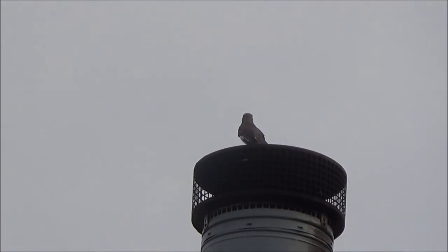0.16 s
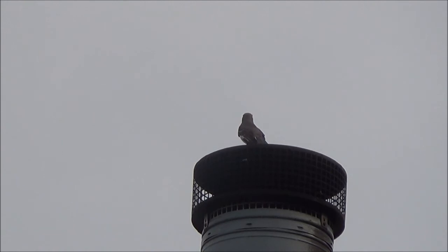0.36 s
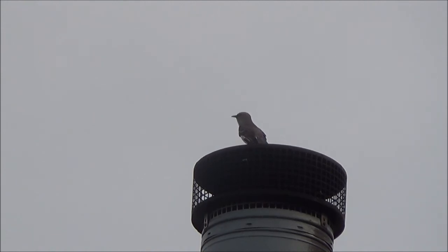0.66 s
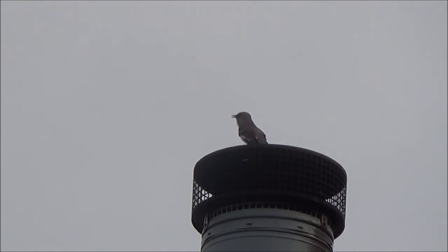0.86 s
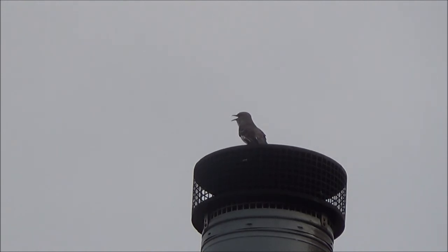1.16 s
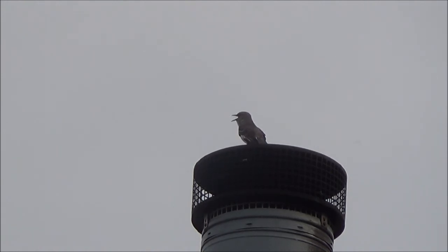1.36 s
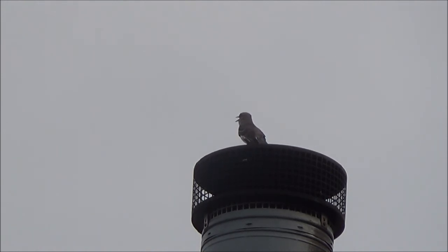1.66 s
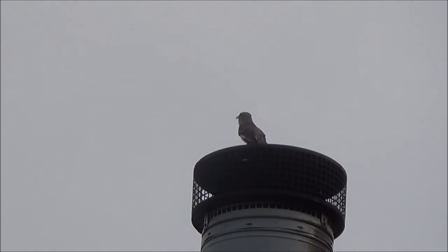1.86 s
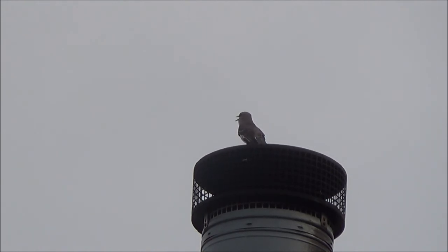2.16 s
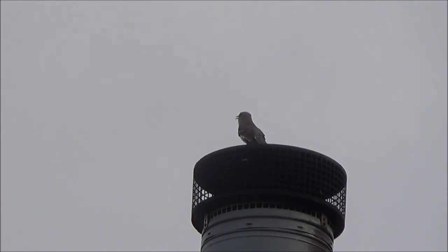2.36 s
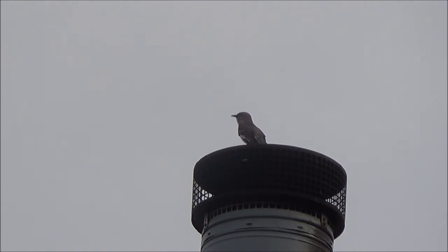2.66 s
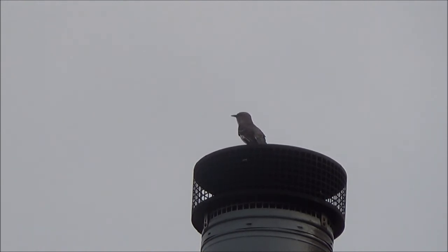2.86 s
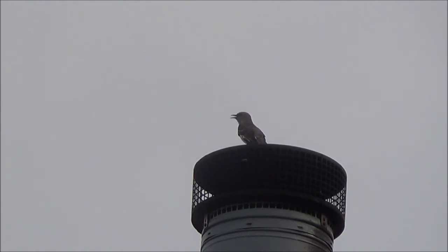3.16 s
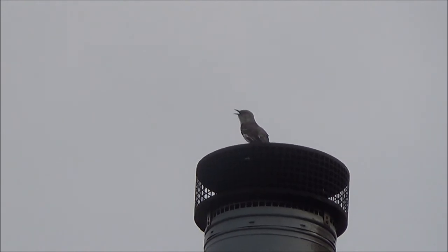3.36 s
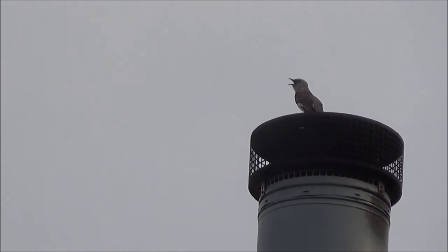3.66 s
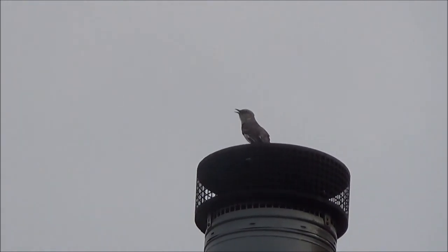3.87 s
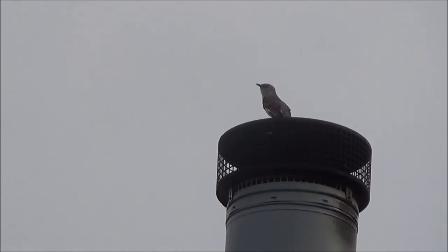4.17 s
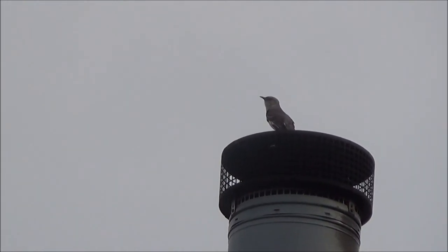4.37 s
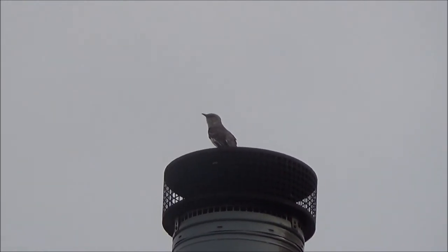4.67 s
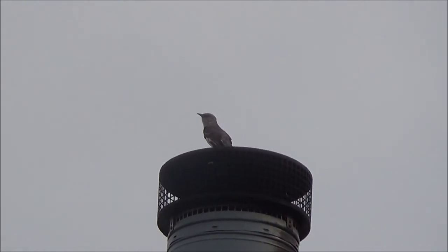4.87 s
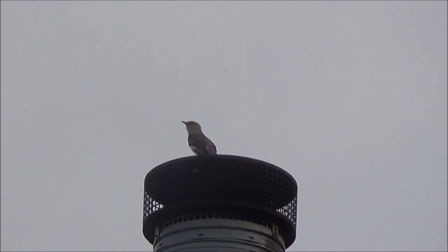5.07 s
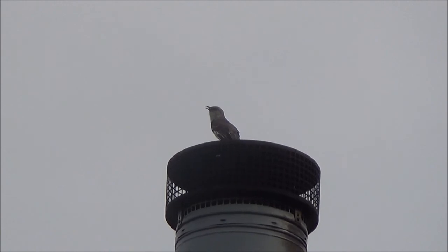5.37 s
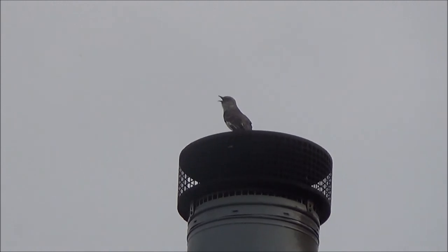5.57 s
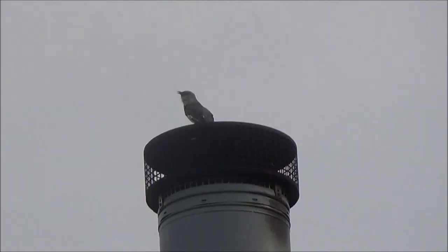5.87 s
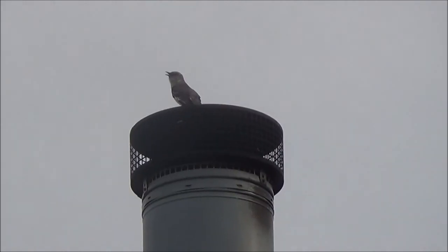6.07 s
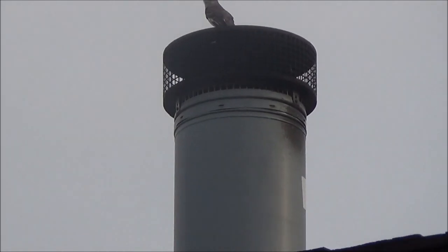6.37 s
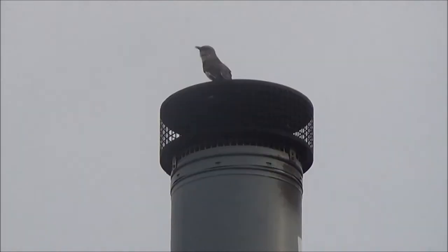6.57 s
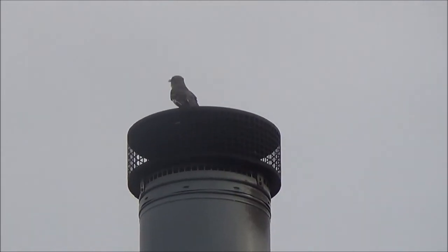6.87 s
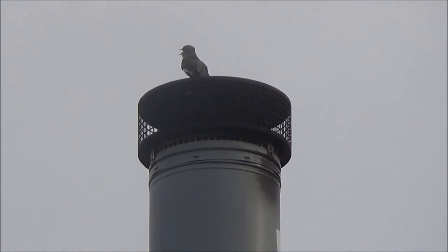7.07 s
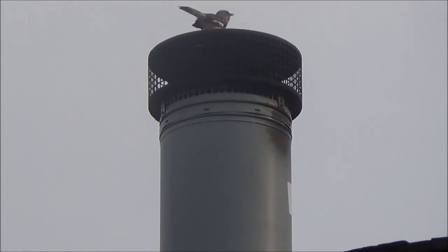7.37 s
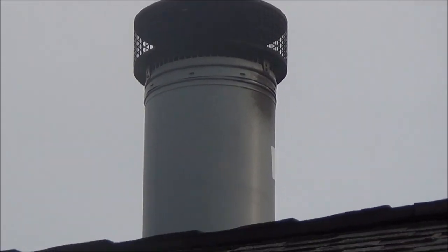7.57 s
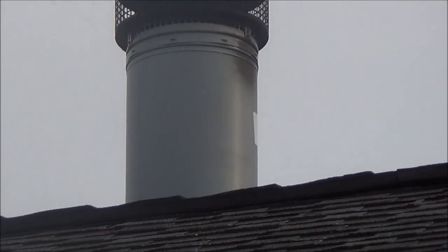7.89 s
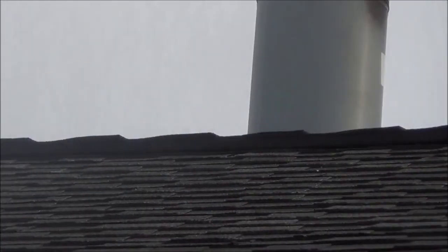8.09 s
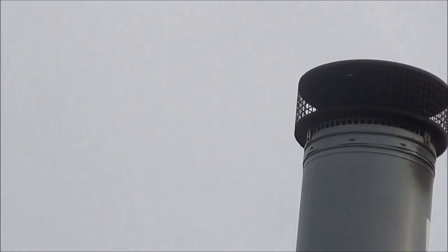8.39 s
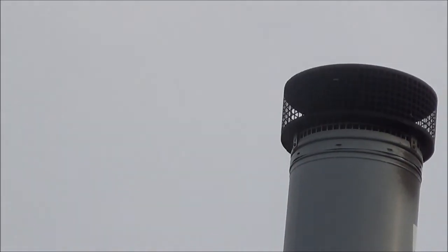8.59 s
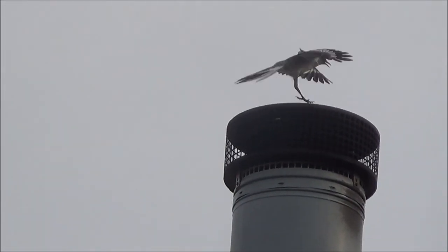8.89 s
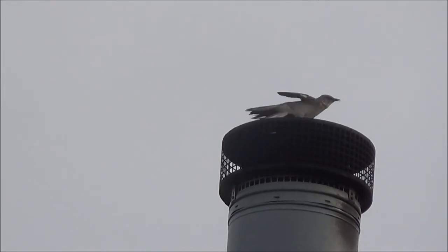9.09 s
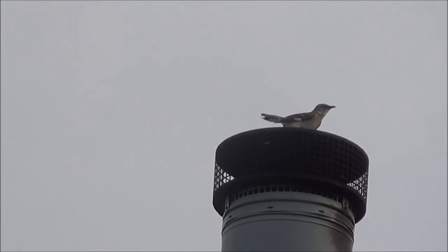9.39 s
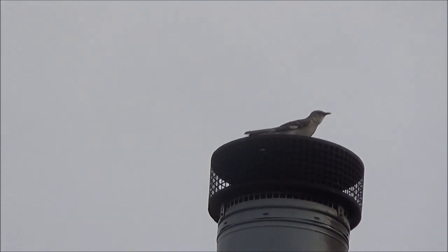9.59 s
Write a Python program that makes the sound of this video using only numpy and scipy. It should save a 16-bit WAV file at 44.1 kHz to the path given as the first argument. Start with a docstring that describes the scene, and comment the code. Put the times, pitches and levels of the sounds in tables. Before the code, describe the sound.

Loud, bright mockingbird song in repeated phrases, shifting from rapid sharp chirps to lower whistles and warbles, over soft air hiss, with fumbling knocks and clicks.

```python
"""Chimney top in town: a mockingbird gives two buzzes, phrases of three notes and a faint tail, held whistles with
hooks and peaks, then a trill with a faint rattle under it, a chip and warbles; gliding oscillators, or pulses
rung in a throat, make them. Shaped noise makes air, rumble, far engine and insects; sines make a hum, a thin tone
and far whistles. Hands rustle, crackle and knock on the camera (noise and damped sines); its gain control ducks
on high peaks."""
import sys
import numpy as np
from scipy import signal
from scipy.io import wavfile
from scipy.ndimage import uniform_filter1d

SR = 44100
rng = np.random.default_rng(int(sys.argv[2]) if len(sys.argv) > 2 else 0)


def wav_record(signal):
    """Record a signal, one row per channel, as 16-bit PCM in the file named by sys.argv[1]."""
    frames = np.transpose(np.atleast_2d(signal))
    bounded = np.clip(frames, -1, 1)
    # unit amplitude maps onto the largest positive 16-bit level
    quanta = np.round(bounded * 32767).astype(np.int16)
    wavfile.write(sys.argv[1], SR, quanta)


N = 429534


def amp(db):
    """Decibels to gain."""
    return 10 ** (np.asarray(db) / 20)


def rms_one(x):
    """Scale to rms 1."""
    return x / np.sqrt(np.mean(x ** 2) + 1e-20)


def curve(rows, outside=None):
    """Columns of a time table, interpolated at each sample."""
    s, *columns = np.transpose(rows)
    return [np.interp(np.arange(N) / SR, s, c, outside, outside) for c in columns]


def at_hz(points, hz):
    """Read a table on a log-frequency axis."""
    table_hz, values = np.array(points).T
    return np.interp(np.log(hz), np.log(table_hz), values)


def span(s, length_s):
    """Sample indices of an event."""
    return np.arange(round(s * SR), round((s + length_s) * SR))


def drift(corner_hz):
    """Rms-1 noise through two equal poles, run at SR / 20 and interpolated."""
    r = np.exp(-40 * np.pi * corner_hz / SR)
    white = rng.standard_normal(N // 20 + 4002)
    slow = signal.lfilter([1], [1, -2 * r, r * r], white)[4000:]
    return np.interp(np.arange(N) / 20, np.arange(len(slow)), rms_one(slow))


def filtered(x, order, hz, kind):
    """Butterworth filter."""
    return signal.sosfilt(signal.butter(order, hz, kind, fs=SR, output="sos"), x)


def ring(x, hz, t60_s):
    """Two-pole resonance: a unit click rings as a damped sine of height 1."""
    r, w = amp(-60 / (t60_s * SR)), 2 * np.pi * hz / SR
    return signal.lfilter([0, np.sin(w)], [1, -2 * r * np.cos(w), r * r], x + 1e-18)


def ring_twice(x, hz, t60_s):
    """Steeper resonance, rms 1."""
    return rms_one(ring(ring(x, hz, t60_s), hz, t60_s))


def banded_noise(spectrum, patchy_db):
    """Half-octave bands of stereo noise, each with its own level, flicker and L-R likeness; rms 1."""
    # f/Hz, L-R likeness (1 same, -1 opposite)
    likeness = [(120, 0.98), (600, -0.044), (1400, -0.4), (4400, 1)]
    out, white = 0, rng.standard_normal((2, 2, N))
    octaves = np.log2(spectrum[-1][0] / spectrum[0][0])
    edges = spectrum[0][0] * 2 ** np.arange(0, octaves + .5, .5)
    for k, (low, high) in enumerate(zip(edges, np.minimum(edges[1:], .45 * SR))):
        mid, side = filtered(white[k % 2], 2, [low, high], "band")
        centre_hz = np.sqrt(low * high)
        alike = np.clip(at_hz(likeness, centre_hz), -1, 1)
        gain = amp(at_hz(spectrum, centre_hz) + patchy_db * drift(6.0))
        out = out + gain * (np.sqrt(1 + alike) * mid + np.sqrt(1 - alike) * side * [[1], [-1]])
    return rms_one(out)


def air_hiss():
    """Broadband noise falling towards the treble."""
    # f/Hz, relative density/dB
    air_spectrum = [(220, -3.5), (900, -5), (2500, -12), (6500, -18.5), (16000, -22.5)]
    return amp(-42.0) * banded_noise(air_spectrum, patchy_db=0.5)


def traffic_rumble():
    """Patchy low noise under a slow level curve."""
    # f/Hz, relative density/dB
    low_spectrum = [(25, -12.5), (60, -0.5), (180, -4), (260, -26.5)]
    # t/s, level/dB
    rumble_level = [(0, -42), (1.1, -41.5), (4.3, -46), (6, -48), (8.5, -43), (9.7, -47)]
    return amp(curve(rumble_level)[0]) * banded_noise(low_spectrum, patchy_db=2.5)


def far_engine():
    """Noise in 70-190 Hz swells and fades."""
    # t/s, level/dB
    passing_level = [(5.8, -52), (6.3, -38.5), (7.7, -39.5), (8.1, -53)]
    return amp(curve(passing_level)[0]) * rms_one(filtered(rng.standard_normal(N), 2, [70, 190], "band"))


def hum():
    """119 Hz sine, wavering in level and phase."""
    phase = 2 * np.pi * 119 * np.arange(N) / SR + drift(1.7)
    return amp(-44.5 + 0.69 * drift(3.4)) * np.sin(phase)


def insects():
    """Partly shared stereo noise in a narrow resonance, flickering."""
    noise = rng.standard_normal(N) + 1.25 * rng.standard_normal((2, N))
    return amp(-51 + 2.2 * drift(23)) * ring_twice(noise, 5696, 0.003)


def thin_tone():
    """Steady 15735 Hz sine."""
    return amp(-57.0) * np.sin(2 * np.pi * 15735 * np.arange(N) / SR)


def rustle():
    """Fingers rub the case: sparse random grains, band-passed, stereo."""
    # t/s, level/dB
    rustle_level = [(2.5, -47), (2.62, -38), (3.12, -42.5), (3.3, -35.5), (3.6, -39.5), (4.6, -46)]
    grains_per_s = 1500
    hits = rng.random((2, N)) < grains_per_s / SR
    grains = hits * amp(4.0 * np.minimum(rng.exponential(1, (2, N)), 5))
    rubbed = filtered(grains * rng.choice([-1, 1], (2, N)), 2, [450, 3800], "band")
    return amp(curve(rustle_level)[0]) * rms_one(amp(3.75 * drift(7.3)) * rubbed)


def far_whistles():
    """Thin whistles and a far bird's chirps: faint wavering sines that swell and fade."""
    # thin whistles: t/s, length/s, from f/Hz, to f/Hz, level/dB
    thin = [(0.001, 0.061, 3280, 3300, -45), (.24, 0.13, 2930, 2860, -44), (.655, 0.065, 3150, 2620, -49),
            (.76, 0.08, 3130, 2700, -45), (6.9, 0.38, 6440, 7240, -52.5), (7.19, 0.21, 7000, 8400, -52),
            (7.74, 0.37, 4730, 5160, -49)]
    # far bird: t/s, level/dB
    chirps = [(.585, -49), (.732, -49), (4.712, -58)]
    chirp_s, chirp_from_hz, chirp_to_hz = 0.042, 4550, 3320
    rows = thin + [(s, chirp_s, chirp_from_hz, chirp_to_hz, db) for s, db in chirps]
    out, waver, flicker = np.zeros(N), drift(53), amp(5.5 * drift(84))
    for s, length_s, from_hz, to_hz, level_db in rows:
        at = span(s, length_s)
        u = np.clip((at / SR - s) / length_s, 0, 1)
        hz = (from_hz + (to_hz - from_hz) * u) * (1 + 0.007 * waver[at])
        swell = np.sqrt(2 * np.sin(np.pi * u)) * amp(level_db)
        out[at] += swell * flicker[at] * np.sin(2 * np.pi * np.cumsum(hz) / SR)
    return out


def yard(x, t60_s):
    """Roofs and walls return a decaying scatter of dull echoes, different on each side."""
    t = np.arange(round(.3 * SR)) / SR
    scatter = rng.standard_normal((2, len(t))) * amp(-60 * t / t60_s) * (t > .012)
    scatter = scatter / np.sqrt(np.sum(scatter ** 2) / 2)
    dull = filtered(x + 1e-18, 2, 5500, "low")
    return signal.fftconvolve(dull[None], scatter, axes=1)[:, :N]


def buzzes():
    """Pulses whose rate and strength swing about 75 times a second, partly noisy, ring in the throat."""
    # t/s, length/s, level/dB
    buzz_rows = [(.125, 0.084, -20.5), (0.427, 0.073, -21.5)]
    rate_jitter, roughness, unevenness_rad = .022, .4, .15
    first_throb_s, body_after_s, edge_s, throb_db = .015, 0.013, 0.012, 2.5
    out, jitter, noise, uneven = np.zeros(N), drift(213), rng.standard_normal(N), drift(28)
    for s, length_s, level_db in buzz_rows:
        at = span(s, length_s)
        t = at / SR - s
        hz = np.where(t < first_throb_s, 740., 1010.)   # lower first throb
        swing = 2 * np.pi * 75 * t + unevenness_rad * uneven[at]
        turns = np.cumsum(hz * (1 + 0.13 * np.sin(swing - 2.05) + rate_jitter * jitter[at])) / SR
        pulses = sum(np.cos(2 * np.pi * k * turns) for k in range(1, 11))
        pulses = pulses * (1 + roughness * noise[at])
        throat = rms_one(ring(ring(pulses, 3090, 0.0048), 4030, 0.0046))
        throat = throat + 0.11 * rms_one(ring(pulses, 8650, 0.00084))
        # beak starts wide open
        throat = throat + 0.84 * np.exp(-t / 0.02) * ring_twice(pulses, 4820, 0.0036)
        first = 0.78 * np.sin(np.pi * np.clip(t / first_throb_s, 0, 1))
        body = np.clip(np.minimum(t - body_after_s, length_s - t) / edge_s, 0, 1)
        body = body * amp(throb_db * np.sin(swing + 2.8))
        out[at] = amp(level_db) * (first + body) * rms_one(throat)
    return filtered(out + 1e-18, 4, 1650, "high")


def notes():
    """Spell the song out as (kind, t/s, length/s, from f/Hz, to f/Hz, level/dB[, lateness])."""
    # phrases: t/s, wait until slur/s, length/s, rise from f/Hz, rise lateness [power], rise level/dB,
    # slur f/Hz, slur level/dB
    phrases = [(0.783, 0.11, 0.19, 3750, 2.4, -16, 2903, -18),
               (1.009, 0.12, 0.2, 3207, .75, -11.5, 2880, -17.5),
               (1.244, .118, 0.2, 3460, 1.05, -12, 3086, -17),
               (1.502, 0.11, .198, 3630, 1.05, -10.5, 3060, -17.5),
               (1.808, 0.11, .196, 3740, 1.05, -15, 3075, -20),
               (2.058, 0.12, 0.19, 3700, .95, -15, 3035, -18),
               (2.313, 0.11, 0.19, 3620, .95, -14.5, 3073, -20.5),
               (3.203, .113, .186, 3850, 1.2, -14, 3123, -14),
               (3.434, 0.12, 0.2, 3680, .9, -8, 3030, -15.5),
               (3.679, 0.12, 0.2, 3540, .65, -6.5, 3015, -16), (3.956, 0.12, 0.2, 3616, .9, -8, 3183, -13)]
    # held whistles: t/s, grace end after t/s, peak after t/s, hold from f/Hz, hold to f/Hz,
    # hook, hold and peak level/dB
    held = [(5.425, 0.067, .17, 2140, 2300, -22, -32, -24),
            (5.762, 0.071, .192, 2130, 2280, -18.5, -28.5, -23.5),
            (6.13, 0.074, 0.18, 2170, 2404, -18.5, -27.5, -22),
            (6.481, 0.078, 0.21, 1970, 2353, -19, -28.5, -24.5),
            (6.887, .07, .21, 2210, 2150, -21.5, -27, -27.5),
            (7.287, .069, .2, 2130, 2270, -21.5, -27, -26),
            (7.696, .074, .261, 1993, 2175, -20.5, -29, -24.5),
            (8.17, 0.076, 0.23, 2128, 2210, -19.5, -29.5, -22.5)]
    # t/s, length/s, centre f/Hz, level/dB
    trill_row = (8.655, .24, 2152, -24.5)
    # t/s, length/s, centre f/Hz, level/dB
    chip_row = (8.951, .024, 3830, -14.5)
    # t/s, length/s, from f/Hz, to f/Hz, level/dB
    rattle_row = (8.695, .075, 2550, 2950, -43)
    # t/s, centre f/Hz, level/dB
    warbles = [(9.144, 2070, -26.5), (9.293, 2024, -24), (9.522, 2030, -25), (9.674, 2013, -22.5)]
    warble_s = .12
    rise_share, dip_at, tail_at = .455, .475, .72   # shares of the wait
    rise_top_hz, dip_s, tail_s = 4615, .042, 0.03
    dip_pitch, tail_pitch, tail_spread = .82, 0.77, .05   # re slur pitch; tail varies by phrase
    dip_base_db, dip_follows, tail_under_db = -14, 0.34, 8   # dip follows a share of the rise's dB
    hook_s, hook_hz = .033, 2522
    grace_after_s, grace_hz, grace_under_db = .045, 2300, 2.5
    break_s, peak_s, peak_lift, peak_hz = .004, .063, 1.1, 2586   # lift re the hold's last pitch

    out = []
    for kind, (s, length_s, hz, db) in (("trill", trill_row), ("chip", chip_row)):
        out += [(kind, s, length_s, hz, hz, db)]
    out += [("rattle", *rattle_row)]
    out += [("warble", s, warble_s, hz, hz, db) for s, hz, db in warbles]
    for s, wait, length_s, rise_hz, lateness, rise_db, hz, db in phrases:
        dip_hz = dip_pitch * hz
        tail_hz = tail_pitch * hz * (1 + tail_spread * rng.uniform(-1.04, 1))
        dip_db = dip_base_db + dip_follows * rise_db
        out += [("rise", s, rise_share * wait, rise_hz, rise_top_hz, rise_db, lateness),
                ("dip", s + dip_at * wait, dip_s, dip_hz, dip_hz, dip_db),
                ("tail", s + tail_at * wait, tail_s, tail_hz, tail_hz, dip_db - tail_under_db),
                ("slur", s + wait, length_s - wait, hz, hz, db)]
    for s, graced, wait, from_hz, to_hz, hook_db, hold_db, peak_db in held:
        grace_s, hold_s = graced - grace_after_s, wait - graced - break_s
        out += [("hook", s, hook_s, hook_hz, hook_hz, hook_db),
                ("grace", s + grace_after_s, grace_s, grace_hz, grace_hz, hook_db - grace_under_db),
                ("hold", s + graced + break_s, hold_s, from_hz, to_hz, hold_db),
                ("peak", s + wait, peak_s, peak_lift * to_hz, peak_hz, peak_db)]
    return out


def note_tracks(quaver):
    """Notes set the main side's pitch and level; tail and rattle sound on the syrinx's other side."""
    # by kind: share of note, offset/semitones, level/dB
    shapes = { "rise": [(0, -.1, -21.5), (.18, -.4, -6.5), (.38, 0.02, -1.4), (.64, -0.24, -12),
              (1, -1.67, -29.5)], "dip": [(0, 0.07, -10.5), (.17, 4, 0.5), (.47, -1.93, 0), (.72, -4.5, -9),
              (1, -4.5, -19.5)], "tail": [(0, 4.5, -8), (.3, -0.4, -0.5), (.6, 0.1, -4), (.85, 0, -6),
              (1, 4, -6)], "slur": [(0, -2, -15), (.22, -1, 0), (.45, -.5, 2.5), (.7, 1.55, 2.5),
              (.9, 1.03, -5.5), (1, -3.5, -25.5)], "hook": [(0, 6, -20.5), (.24, 10, -17.5),
              (.42, 1.5, 4.5), (.58, -2.5, -2), (.8, -2, 1), (1, 3, -6)], "grace": [(0, 6.5, -14),
              (.2, 1.5, -3), (.42, -1.3, -1.6), (.85, -0.6, -4), (1, 0.1, -13)], "hold": [(0, 1.2, -9),
              (.1, -.1, -3), (1, .3, 2.5)], "peak": [(0, -1.16, -7), (.26, -0.65, 5), (.38, 3, 4.5),
              (.5, 10, -12), (.59, 2.5, 15), (.66, -2, -3.5), (.8, -3.5, -2.5), (1, -2.2, -10)],
              "trill": [(0, 3.5, -27), (.1, 2, 2), (.2, -4.5, -9.5), (.38, -6, -8.5), (.49, -2.5, -8.5),
              (.6, 4.5, -1), (.65, 4, 5.5), (.69, -0.2, 3.5), (.76, -3.5, -2.5), (.82, -1.5, 3.5),
              (1, 2, -12)], "chip": [(0.0, -2, -13), (0.27, 2, 4.5), (0.47, -5, -14), (0.64, 2.3, -0.5),
              (1.0, 9, -26)], "warble": [(0, 4.5, -21.5), (.15, 2, 3.5), (.24, -2.5, 1), (.28, 5, 4),
              (.38, 6.5, -3.5), (.58, -2, 0.2), (.76, -3, -5), (1, -1.5, -9.5)], }
    # by kind: overtone level re main tone/dB
    overtones = {"rise": -22, "dip": -37, "chip": -20, "warble": -25}
    other_overtones_db = -30.5
    rise_reach, hold_lateness = .53, 1.7   # share of note where a rise tops out; power of hold glide
    hz, gain, edge, thrown, other = np.zeros((5, N))
    shaky = drift(96)   # other side: unsteady level, and pitch by about a semitone
    for kind, s, length_s, from_hz, to_hz, level_db, *lateness in notes():
        share, semitones, swell_db = np.transpose(shapes["hold" if kind == "rattle" else kind])
        at = np.arange(round(s * SR), min(round((s + length_s) * SR), N))
        u = (at / SR - s) / length_s
        reached = u
        if kind == "rise":
            reached = np.clip(u / rise_reach, 0, 1) ** lateness[0]
        elif kind == "hold":
            reached = np.abs(u) ** hold_lateness
        glide = (from_hz + (to_hz - from_hz) * reached) * 2 ** (np.interp(u, share, semitones) / 12)
        swell = amp(level_db + np.interp(u, share, swell_db))
        if kind in ("tail", "rattle"):
            shaken = glide * 2 ** ((quaver[at] + shaky[at - 300]) / 12)
            other[at] = swell * amp(3.0 * shaky[at]) * np.sin(2 * np.pi * np.cumsum(shaken) / SR)
            continue
        hz[at], gain[at] = glide, swell
        edge[at] = amp(overtones.get(kind, other_overtones_db))
        thrown[at] = 1 if kind == "peak" else .35   # the peak is flung down hardest
    return hz, gain, edge, thrown, other


def song(waver, rasp):
    """One gliding near-sine syrinx oscillator; slack membranes swing unevenly after fast falls."""
    # t/s, quaver depth/semitones
    quaver_depth = [(8.68, 0.091), (8.70, 1.45), (8.765, 1.3), (8.785, .1), (8.81, 0.11), (8.82, 2.2),
                    (8.85, 0.63)]
    # overtone colour: f/Hz, level/dB
    beak = [(4000, 1), (6500, -9), (10500, 2.5), (16000, -16.5)]
    unsteady_db, slack_db = 1.1, .07   # level flutter; extra per unit of slack
    quaver_phase = 2 * np.pi * 82 * np.arange(N) / SR + drift(30.6) - 1.1
    quaver = curve(quaver_depth, outside=0)[0] * np.sin(quaver_phase)
    hz, gain, edge, thrown, other = note_tracks(quaver)
    sung = np.flatnonzero(hz)
    hz = uniform_filter1d(np.interp(np.arange(N), sung, hz[sung]), size=130)

    falling = np.clip(-np.gradient(np.log2(hz)) * SR, 0, 90) * thrown   # weighted octaves/s
    slack = signal.lfilter([.0014], [1, -.9986], falling)
    boost_db = 0.83 * slack * np.clip((2800 - hz) / 400, 0, 1)   # only low notes

    hz = hz * 2 ** (quaver / 12)
    phase = 2 * np.pi * np.cumsum(hz * (1 + waver * drift(58.5))) / SR
    # phase jitter roughens the louder notes
    phase = phase + rasp * np.sqrt(gain) * rms_one(np.diff(drift(600), prepend=0))

    out = np.sin(phase) + edge * amp(boost_db + 3.0 * drift(13.5)) * np.sin(2 * phase)
    # voice breaks in the peak: partial at 3/2 of the pitch
    broken = amp(boost_db - 14 + 5 * drift(89)) * (thrown == 1)
    out += edge * broken * np.sin(3 * phase / 2)
    for k in range(3, 8):   # higher overtones come and go
        high_hz = k * hz[sung]
        colour_db = at_hz(beak, high_hz) + 5.97 * drift(13.5)[sung] + 0.43 * boost_db[sung]
        in_band = high_hz < .45 * SR
        out[sung] += edge[sung] * amp(colour_db) * in_band * np.sin(k * phase[sung])
    # level quaver leads pitch quaver by 80 samples
    throb_db = (unsteady_db + slack_db * slack) * drift(118) + 2.5 * np.roll(quaver, -80)
    return np.sqrt(2) * amp(throb_db) * (uniform_filter1d(gain, size=80) * out + other)


def crackle():
    """Bright crackle of fingers: random ticks over faint noise, 3-11 kHz, gated."""
    # t/s, length/s, level/dB
    crackles = [(2.91, 0.05, -39), (3.592, 0.043, -35.5), (5.791, .009, -30)]
    t, ticks_per_s = np.arange(N) / SR, 500
    ticks = (rng.random(N) < ticks_per_s / SR) * rng.standard_normal(N)
    ticks = ticks + 0.087 * rng.standard_normal(N)
    spells = sum(amp(db) * (np.abs(t - s - length_s / 2) < length_s / 2) for s, length_s, db in crackles)
    return spells * rms_one(filtered(ticks, 2, [3000, 11000], "band"))


def knocks():
    """Dull knocks: the hollow body rings at 540 Hz with a puff of noise."""
    # t/s, level/dB
    knock_rows = [(2.918, -27.5), (3.828, -27), (4.071, -27), (4.582, -28.5), (5.793, -22.5), (6.72, -26),
                  (7.922, -19), (8.548, -25.5), (8.845, -24.5)]
    out, t = np.zeros(N), np.arange(round(.03 * SR)) / SR
    for (s, level_db), puff in zip(knock_rows, rng.standard_normal((len(knock_rows), len(t)))):
        dull = filtered(puff, 2, [260, 1400], "band")
        body = 0.8 * np.sin(2 * np.pi * 540 * t) + 2.7 * dull
        out[round(s * SR):][:len(t)] += amp(level_db - 60 * t / 0.072) * body
    return out


def clicks():
    """Sharp clicks excite the case's damped modes, each leaving a short bright splash of noise."""
    # t/s, level/dB
    click_rows = [(2.978, -18.5), (3.411, -10.5), (5.8095, 8.5), (5.84, 3.5), (7.9136, 7.5)]
    # case modes: f/Hz, level/dB, t60/s
    case_modes = [(2140, -8, 0.013), (4730, -1.5, 0.00068), (7950, -3.5, 0.0015)]
    strikes = np.zeros(N)
    strikes[[round(s * SR) for s, db in click_rows]] = amp([db for s, db in click_rows])
    struck = sum(amp(db) * ring(strikes, hz, t60_s) for hz, db, t60_s in case_modes) / 2
    fading = signal.lfilter([1], [1, -amp(-60 / (0.025 * SR))], strikes + 1e-18)
    splash = filtered(fading * rng.standard_normal(N), 2, [3000, 11000], "band")
    return struck + amp(-22.5) * splash


def scene():
    """Bird a little to the right, with echoes, over background and handling."""
    bird = song(waver=0.002056, rasp=0.068) + buzzes()
    far = far_whistles()
    echoes = amp(-19.0) * yard(bird + amp(24) * far, t60_s=0.21)
    background = air_hiss() + traffic_rumble() + far_engine() + hum() + insects() + thin_tone()
    handling = rustle() + crackle() + knocks() + clicks()
    return bird * amp([[-.6], [.6]]) + echoes + far + handling + background


def record(dry):
    """Gain ducks on peaks above -1 dB full scale and creeps back; overloads clip; the top is cut."""
    creep_db = 2.1 * np.arange(N) / SR   # recovery 2.1 dB/s
    over_db = np.maximum(20 * np.log10(np.abs(dry).max(axis=0) + 1e-9) + 1, 0)
    duck_db = np.maximum.accumulate(over_db + creep_db) - creep_db
    duck_db = signal.lfilter([.01], [1, -.99], duck_db)   # attack lags about 100 samples
    cut = signal.ellip(10, .5, 60, 15900, fs=SR, output="sos")
    return signal.sosfilt(cut, np.clip(dry * amp(-duck_db), -1, 1))


dry = scene()
out = record(dry)
wav_record(out)
```